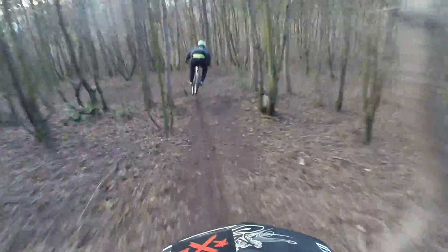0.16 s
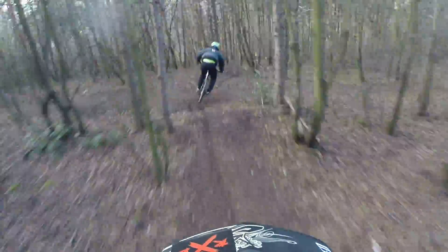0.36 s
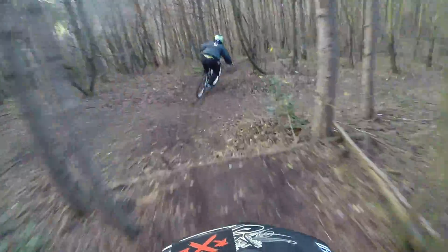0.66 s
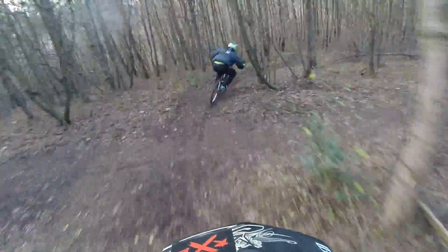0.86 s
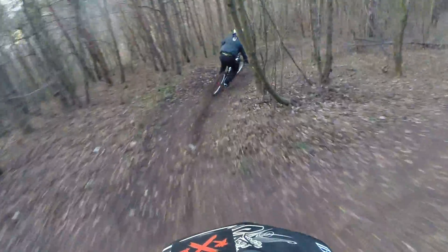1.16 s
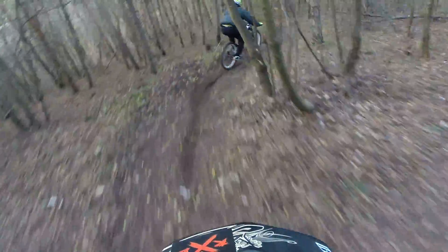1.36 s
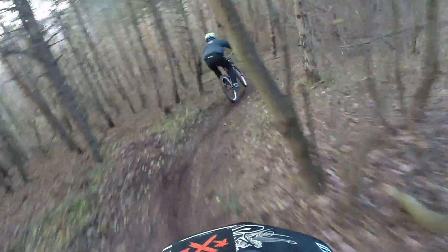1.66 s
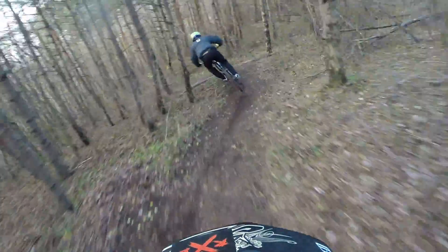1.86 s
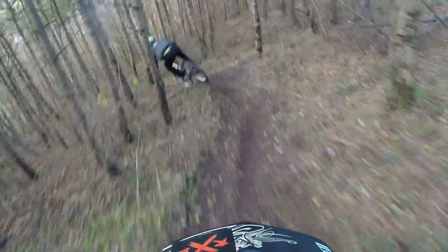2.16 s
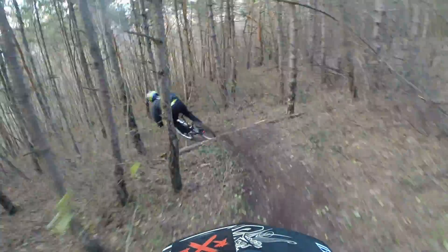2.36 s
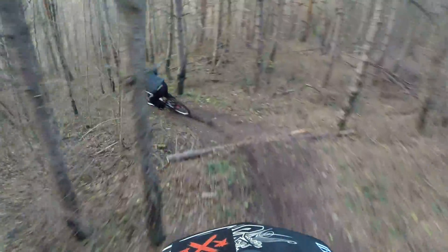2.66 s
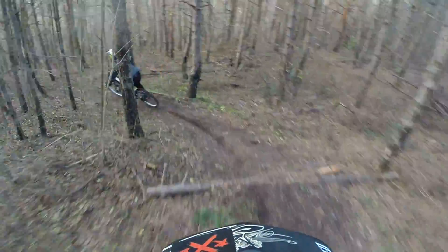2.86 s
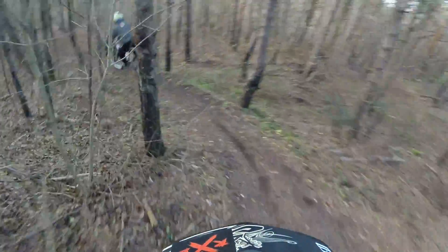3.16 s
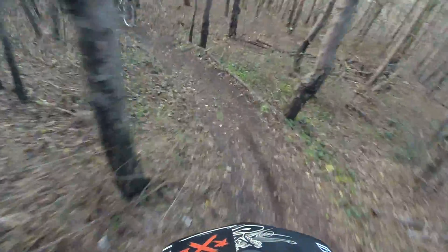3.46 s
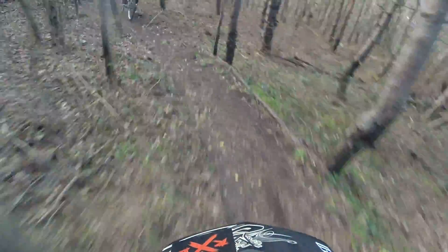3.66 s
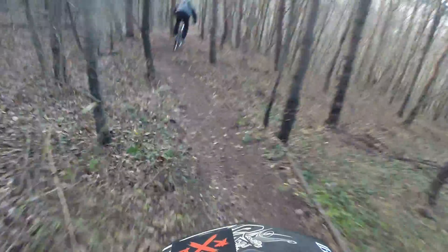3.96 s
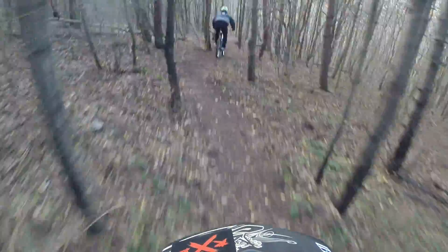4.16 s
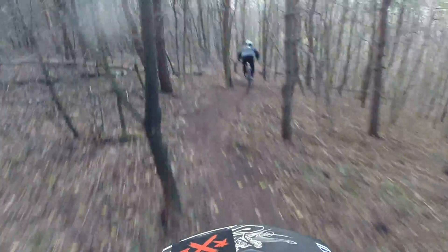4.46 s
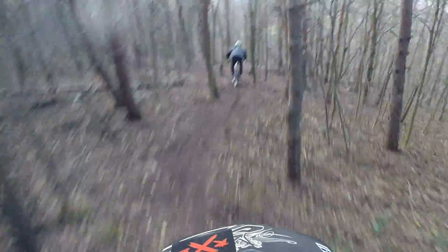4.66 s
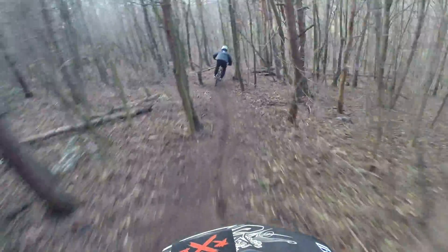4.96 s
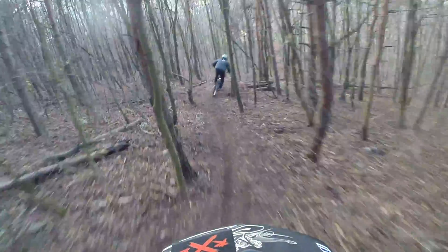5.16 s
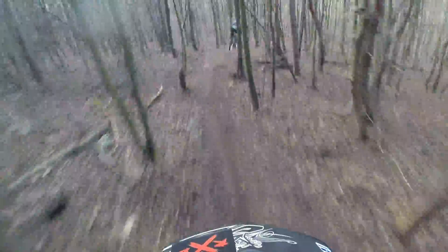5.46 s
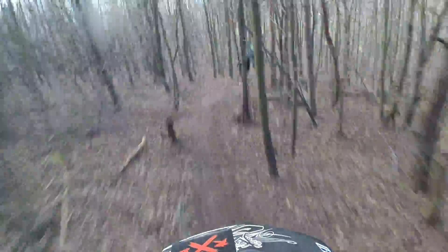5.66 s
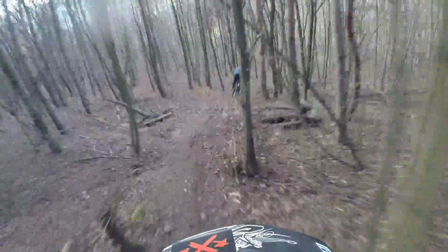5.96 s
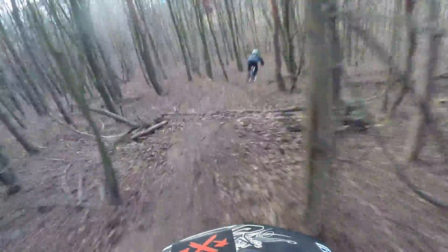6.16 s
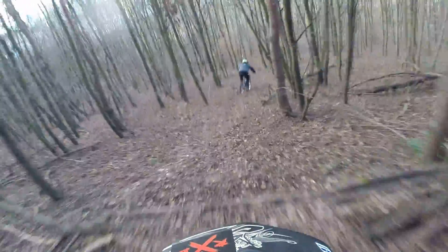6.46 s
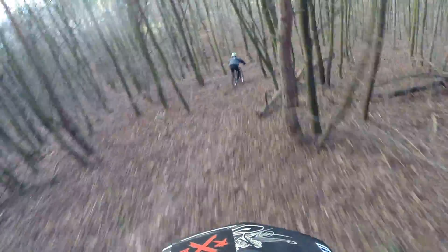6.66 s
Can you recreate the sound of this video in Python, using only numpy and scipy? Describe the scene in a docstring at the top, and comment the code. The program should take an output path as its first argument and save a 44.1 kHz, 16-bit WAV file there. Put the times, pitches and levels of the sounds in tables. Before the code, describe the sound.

From a cased microphone on a mountain biker's helmet in open woods, hollow wind hiss and low buffeting start strong, then sink through slow bends, revealing tyre crunch, chain jangle and clattering stones. Dull bumps thud. Speed and hiss return, a hard knock lands, and late on a twig whips the helmet with a very loud scraping crack, after which everything is briefly quieter.

```python
"""Wind hisses through and buffets a cased camera on the helmet of a mountain biker on a fast forest descent.
The hiss is noise lifted at the resonances of the case; slow noise makes the buffeting and rumble.
The tyres crunch over dirt and leaves in clumps of tiny cracks; chain, stones and metal parts jangle.
Bumps knock the mount, heard as dying sines, and the brake discs are rubbed lightly.
Near the end something, probably a twig, whips the helmet, and the gain control ducks."""
import sys
import numpy as np
from scipy import signal
from scipy.fft import rfft, irfft
from scipy.io import wavfile
from scipy.ndimage import uniform_filter1d

SR = 44100
rng = np.random.default_rng(int(sys.argv[2]) if len(sys.argv) > 2 else 0)


def store_wav(level_fs):
    """Save 16-bit WAV to argv[1]."""
    pcm = np.round(np.clip(np.atleast_2d(level_fs), -1, 1) * 32767)
    wavfile.write(sys.argv[1], SR, pcm.T.astype(np.int16))


N = 300318
TIME = np.arange(N) / SR
# In all tables, t60_s is the time a sound takes to fall by 60 dB.


def amp(db):
    """Turns decibels into gain."""
    return 10 ** (np.asarray(db) / 20)


def unit(x):
    """Scales a sound to an rms of 1."""
    return x / np.sqrt(np.mean(x ** 2) + 1e-20)


def level(curve):
    """Gain at every sample from rows of start_s, level_db, joined by straight lines in dB."""
    return amp(np.interp(TIME, *np.transpose(curve)))


def swells(rows, fade_s=0.042):
    """Gain at every sample from rows of start_s, length_s, level_db; each rises, holds and falls."""
    total = np.zeros(N)
    for start_s, length_s, db in rows:
        to_edge_s = np.minimum(TIME - start_s, start_s + length_s - TIME)
        total += amp(db) * np.clip(to_edge_s / fade_s, 0, 1)
    return total


def add(mix, start_s, sound):
    """Mixes a sound in at its start time, cut off at the end of the scene."""
    part = mix[round(start_s * SR):][:len(sound)]
    part += sound[:len(part)]


def colour(x, points, lifts=()):
    """Shapes a sound by a spectrum with resonances on top, then scales it to an rms of 1."""
    hz = np.fft.rfftfreq(len(x), 1 / SR)
    points_hz, points_db = np.transpose(points)
    db = np.interp(np.log(hz + 1), np.log(points_hz + 1), points_db)
    for centre_hz, width_hz, lift_db in lifts:
        db = db + lift_db / (1 + (2 * (hz - centre_hz) / width_hz) ** 2)
    return unit(irfft(rfft(x) * amp(db), len(x)))


def drift(rate_hz):
    """Slow random motion with an rms of 1, weak above its rate."""
    hz = np.fft.rfftfreq(N, 1 / SR)
    noise = rng.standard_normal(N)
    return unit(irfft(rfft(noise) / (1 + (hz / rate_hz) ** 4), N))


def steady(x, span_s):
    """Evens out the loudness swells that are slower than the span."""
    window = signal.windows.hann(int(span_s * SR) + 3)
    power = signal.fftconvolve(x ** 2, window / window.sum(), "same")
    return x / np.sqrt(power + 1e-4)


def lowpass(x, order, corner_hz):
    """Dulls a sound above a corner frequency."""
    return signal.sosfilt(signal.butter(order, corner_hz, fs=SR, output="sos"), x)


def ring(modes):
    """A struck body: dying sines set off together, every other one upside down."""
    t = np.arange(SR // 2) / SR
    total = np.zeros(len(t))
    for k, (pitch_hz, db, t60_s) in enumerate(modes):
        decay = np.exp(-np.log(1000) * t / t60_s)
        total += (-1) ** k * amp(db) * np.sin(2 * np.pi * pitch_hz * t) * decay
    return total


def burst(t, rise_s, t60_s):
    """Loudness curve of a blow: a quick straight rise, then an exponential fall."""
    decay = np.exp(-np.log(1000) * np.maximum(t - rise_s, 0) / t60_s)
    return np.minimum(t / rise_s, 1) * decay


def jangle(centre_hz, octaves, t60_s, rise_s=0.00099, contacts_per_s=350, contact_db=9, case_hz=9500):
    """A short run of separate contacts in one band of pitch; a narrow band pings."""
    t = np.arange(8192) / SR
    hz = np.fft.rfftfreq(len(t), 1 / SR) + 1
    muffle = 1 / (1 + (hz / case_hz) ** 4)  # the case keeps out the highest treble
    band = 1 / (1 + (np.log2(hz / centre_hz) / octaves) ** 2)
    hits = rng.random(len(t)) < contacts_per_s / SR
    contacts = np.convolve(hits, np.ones(16), "same")  # each contact lasts 16 samples
    drive = rng.standard_normal(len(t)) * (1 + amp(contact_db) * contacts)
    sound = steady(unit(irfft(rfft(drive) * band * muffle)), 0.008)
    return np.roll(sound, len(t) // 2) * burst(t, rise_s, t60_s)  # starts from the middle of the noise


# brake pads brushing the discs: start_s, length_s, level_db
BRAKES = [(2.451, 0.2, -53), (3.929, 0.2, -55)]


def brakes(disc_hz=2230, width_hz=340, lift_db=22):
    """Light rubbing is noise that excites one resonance of the disc, too weakly to squeal."""
    out = np.zeros(N)
    rub_colour = [(800, -30.5), (2200, -2.5), (6000, -22.0)]  # pitch_hz, relative level_db
    for start_s, length_s, db in BRAKES:
        swell = signal.windows.tukey(int(length_s * SR), .5)
        noise = rng.standard_normal(len(swell))
        rub = colour(noise, rub_colour, [(disc_hz, width_hz, lift_db)])
        add(out, start_s, amp(db) * swell * rub)
    return out


# thin metallic pings: start_s, level_db, pitch_hz
PINGS = [(1.587, -49, 4630), (2.143, -65, 9080), (2.228, -58, 9450), (3.497, -64, 9450),
         (3.622, -51.5, 4600)]


def pings():
    """Small metal parts jangle in a band so narrow that it has a pitch."""
    out = np.zeros(N)
    for start_s, db, pitch_hz in PINGS:
        add(out, start_s, amp(db) * jangle(pitch_hz, octaves=0.059, t60_s=0.081))
    return out


# front, then rear wheel striking a root: start_s, level_db
ROOT = [(3.789, -44.5), (3.855, -40)]


def frame():
    """The frame rings in a low, narrow band as each wheel strikes the root."""
    out = np.zeros(N)
    for start_s, db in ROOT:
        add(out, start_s, amp(db) * jangle(640, octaves=0.2, t60_s=0.068))
    return out


# stones and sticks clattering under the wheels: start_s, level_db, t60_s
STONES = [(1.497, -39.5, 0.08), (1.602, -42, .045), (2.284, -43.5, .06), (2.858, -46, 0.1),
          (3.568, -45, 0.13), (3.788, -43, 0.17), (3.853, -35, 0.046), (4.027, -40.5, .06),
          (4.333, -35, 0.032)]


def stones():
    """Stones and sticks clatter as jangles in the middle of the pitch range."""
    out = np.zeros(N)
    for start_s, db, t60_s in STONES:
        add(out, start_s, amp(db) * jangle(2060, octaves=0.36, t60_s=t60_s, rise_s=0.0017))
    return out


def ticks(per_s=9, tick_db=-58.5, spread_db=5.5, pitch_hz=5400, spread_octaves=0.22, load_slope=2.0):
    """The chain ticks lightly at random times, louder where the tyres work harder."""
    out = np.zeros(N)
    starts = TIME[rng.random(N) < per_s / SR]
    for start_s in starts:
        size, shift = rng.standard_normal(2)
        centre_hz = pitch_hz * 2 ** (spread_octaves * shift)
        tick = jangle(centre_hz, octaves=.4, t60_s=.028)
        add(out, start_s, amp(tick_db + spread_db * size) * tick)
    return out * unit(level(TYRES) ** load_slope)


# hardest slaps of the chain: start_s, level_db, centre_hz, width_octaves
CHAIN = [(.904, -52, 6100, .15), (1.301, -52, 6300, .3), (1.436, -56, 5900, .26), (1.472, -61, 5200, .5),
         (1.686, -49, 3500, 1), (2.007, -50.5, 5500, 0.51), (2.266, -45.5, 4940, 0.54),
         (2.75, -55, 5000, .7), (3.872, -43, 3500, .8), (4.087, -47.5, 4500, .55),
         (4.262, -41.5, 5900, 0.3), (4.622, -53.5, 6000, .6), (5.708, -45, 4500, .36)]


def chain():
    """Each hard slap of the chain is a bright jangle of contacts."""
    out = np.zeros(N)
    for start_s, db, centre_hz, octaves in CHAIN:
        add(out, start_s, amp(db) * jangle(centre_hz, octaves, t60_s=0.043))
    return out


# bumps that jolt the mount: start_s, level_db (before a shared 3 dB cut), corner_hz (lower is duller)
KNOCKS = [(0.671, -12, 89), (1.2911, -11.5, 655), (1.707, -25, 89), (2.17, -30, 250), (3.607, -9, 55),
          (3.641, -27, 170), (3.735, -13, 60), (3.776, -27, 400), (3.859, -13, 70), (4.7716, -1.5, 4973),
          (5.51, -12.5, 90), (6.2727, -9.5, 563), (6.774, -14, 786)]
# dead, quickly dying modes of the mount: pitch_hz, relative level_db, t60_s
MOUNT = [(82.96, -16, 0.1), (180, -8, .04), (252, -7.5, 0.067), (365, -9, 0.011), (710, -20, 0.026),
         (955, -9, 0.017), (1504.6, -2, 0.014), (1789.6, -7, 0.027), (2066, -7.5, 0.019), (2630, -11, 0.01)]
# longer ring of helmet and mount: pitch_hz, relative level_db, t60_s
HELMET = [(90.647, -3.5, 0.2349), (249.23, -10, 0.41), (363, -24.5, .3), (483, -20.5, 0.22),
          (628, -6, 0.15), (795, -28.5, .15), (947, -13, .13)]


def knocks(knock_db=-3, rebound=0.58, rebound_s=0.001285, ring_db=-30):
    """The mount hits its stop and rebounds once; soft bumps stir only its low modes."""
    out = np.zeros(N)
    blow = ring(MOUNT) + amp(ring_db) * ring(HELMET)
    for start_s, db, corner_hz in KNOCKS:
        soft = lowpass(lowpass(blow, 2, corner_hz), 5, 3000)
        knock = amp(db + knock_db) * soft
        add(out, start_s, knock)
        add(out, start_s + rebound_s, rebound * knock)
    return out


# the twig slaps, drags and snaps free: start_s, level_db, t60_s, crack_share (0 dull to 1 bright)
WHIP = [(6.3712, -3, .03, .12), (6.3733, 7.5, .026, .025), (6.3783, 8, .03, .09), (6.3853, 9.5, .016, .97),
        (6.3902, -3, .012, .01)]
# spectrum of the dull slap: pitch_hz, relative level_db
SLAP = [(50, -45), (110, -6.5), (250, -8), (420, -19.5), (900, -20.5), (1400, -1.5), (1850, -6),
        (2800, -2.5), (3300, -12), (5000, -17), (8000, -43.5), (15000, -61)]
# spectrum of the bright crack: pitch_hz, relative level_db
CRACK = [(60, -47), (350, -12), (1400, -0.5), (4300, -2.5), (5000, -2), (6100, 2.5), (7400, -6.5),
         (9000, -7), (10000, -16.5), (12000, -22), (15000, -42)]
# pitches that ring briefly in the twig's strike: pitch_hz, width_hz, level_db of the added ring
STRIKE_PITCHES = [(1488, 200, 0.5), (1650, 100, -4.5), (1910, 34, -6.5), (2190, 100, 3), (2250, 73, -6.5),
                  (2870, 88, -3)]


def twig(ring_db=-11, thump_db=5):
    """A quick run of scraping slaps on the helmet, which rings on while the mount is jolted."""
    slaps = np.zeros(N)
    t = np.arange(4096) / SR
    for start_s, db, t60_s, crack_share in WHIP:
        slap = colour(rng.standard_normal(len(t)), SLAP)
        crack = colour(rng.standard_normal(len(t)), CRACK)
        blend = np.sqrt(1 - crack_share) * slap + np.sqrt(crack_share) * crack
        scrape = np.roll(steady(blend, 0.0027), len(t) // 2)
        add(slaps, start_s, amp(db) * scrape * burst(t, 0.0013, t60_s))
    out = slaps.copy()
    for pitch_hz, width_hz, db in STRIKE_PITCHES:
        out += amp(db) * signal.lfilter(*signal.iirpeak(pitch_hz, pitch_hz / width_hz, SR), slaps)
    thump = lowpass(ring(MOUNT), 2, 500)
    add(out, WHIP[1][0], amp(ring_db) * ring(HELMET) + amp(thump_db) * thump)  # from the second slap
    return out


# dull shudder of the padded helmet after the twig: pitch_hz, relative level_db
SHUDDER = [(60, -7.5), (220, 1), (400, -11), (750, -5), (1100, -13), (1900, -9), (4000, -32.5),
           (12000, -48)]


def shudder(shudder_db=-19.5, rise_s=0.0018, t60_s=.14):
    """The twig's blow dies away in the helmet's many damped modes, made as fading dull noise."""
    out = np.zeros(N)
    t = np.arange(SR // 2) / SR
    noise = colour(rng.standard_normal(len(t)), SHUDDER)
    add(out, WHIP[1][0], amp(shudder_db) * noise * burst(t, rise_s, t60_s))
    return out


# how hard the tyres bite into dirt and dry leaves: start_s, level_db (before a shared 3.5 dB cut)
TYRES = [(0, -45.5), (1.25, -51.5), (1.6, -47.5), (2.45, -49), (2.7, -51), (3.45, -55), (3.88, -48),
         (4.9, -49.5), (5.55, -49), (5.85, -44.5), (6.55, -49.5), (6.8, -44)]
# spectrum of the crunch: pitch_hz, relative level_db
TYRE_COLOUR = [(100, -24), (400, -10.5), (1100, -12), (1300, -10), (1750, -6), (2000, -9), (2250, -1),
               (2900, -12), (3700, -19), (4600, -16.5), (6200, -18.5), (8000, -28.5), (10000, -32),
               (15000, -49.5)]


def tyres(grains_per_s=900, spread_db=2.5, clump_db=2.0, grit_db=-4, roll_db=-2):
    """The tread crushes grit and leaves: clumps of tiny cracks over a rolling hiss."""
    loudness = amp(spread_db * np.minimum(rng.exponential(1, N), 4))
    sizes = loudness * rng.choice([-1, 1], N)
    grit = unit(sizes * (rng.random(N) < grains_per_s / SR))
    crunch = amp(grit_db) * grit + amp(roll_db) * rng.standard_normal(N)
    clumped = crunch * amp(clump_db * drift(38))
    return colour(clumped, TYRE_COLOUR) * level(TYRES) * amp(-3.5)


def with_speed(db, slope, reference_db=-34):
    """Gain that follows the wind: the given level at the reference hiss, slope dB more per dB of hiss."""
    return amp(db) * (level(WIND) / amp(reference_db)) ** slope


# spells of turbulence that push on the case: start_s, length_s, level_db
BUFFET = [(.37, 0.49, -30), (1.17, 0.71, -27), (2.06, 0.397, -30), (3.55, 0.568, -24.5), (3.79, 0.12, -22),
          (5.68, 0.09, -21.5), (6.16, .22, -26)]
# spectrum of the buffeting: pitch_hz, relative level_db
BUFFET_COLOUR = [(6, -31.5), (14, 7.5), (24, -5), (34, -6), (50, -17), (80, -19), (200, -58), (600, -85.5)]
# rough patches of trail that shake the helmet: start_s, length_s, level_db
ROUGH = [(.45, 0.27, -45.5), (2.5, 0.12, -48.5), (2.86, 0.13, -50), (3.57, 0.14, -58), (6.22, 0.11, -40.5)]
# spectrum of the helmet's rumble: pitch_hz, relative level_db
RUMBLE_COLOUR = [(35, -33), (60, -24.5), (86, 5.5), (140, -11.5), (195, -12), (245, -6), (290, -11.5),
                 (350, -21.5), (700, -26), (1500, -39.5), (4000, -81.5)]


def shaking(jostle_db=-30, lumpy_db=1.5, gusty_db=1.34):
    """Gusts push on the case; rough ground and turbulence shake the helmet at its low resonances."""
    gusts = steady(colour(rng.standard_normal(N), BUFFET_COLOUR), 0.097)
    shake = steady(colour(rng.standard_normal(N), RUMBLE_COLOUR), 0.054)
    spells = swells(BUFFET)
    push = np.hypot(with_speed(-34.5, slope=0.11), spells)
    jolts = swells(ROUGH) + amp(jostle_db) * spells
    ground = np.hypot(with_speed(-42, slope=0.5), jolts)
    lumps = drift(11.3)  # one irregular jolting moves both
    return gusts * push * amp(gusty_db * lumps) + shake * ground * amp(lumpy_db * lumps)


# air speed past the helmet, as the level of its hiss:
# fast straight, two slow bends, fast straight: start_s, level_db
WIND = [(0, -36), (.43, -37), (.52, -41.5), (1.33, -46), (1.5, -52), (1.9, -50), (2.36, -62.5), (2.98, -50),
        (3.18, -61.5), (3.35, -53), (4.23, -56.5), (4.37, -49), (4.72, -43.5), (4.86, -40), (5.25, -35.5),
        (5.58, -39), (5.76, -33.5), (6.28, -35.5), (6.45, -41.5), (6.8, -45)]
# single gusts that lift the hiss: start_s, length_s, level_db
GUSTS = [(.35, 0.084, -34), (.55, 0.13, -37.5), (1.21, .105, -36.5), (1.61, 0.13, -48.5),
         (5.72, 0.097, -50)]
# spectrum of the hiss: pitch_hz, relative level_db
WIND_COLOUR = [(100, -17.5), (330, -21.5), (800, -17), (1080, -13.5), (1280, 0), (1550, -5), (1950, -4),
               (2500, -8), (3350, -13), (3750, -26.5), (5700, -27), (7000, -39.5), (10000, -53.5),
               (15000, -63.5)]
# air resonances of the case: pitch_hz, width_hz, lift_db
CASE = [(1328, 130, 4.5), (1534, 83, 6.5), (1714, 37, 6), (2630, 76, 6.5), (2853, 160, 2.5), (3520, 550, 7),
        (4640, 150, 6), (5570, 290, 7)]


def wind(flutter_db=1.04, waver_db=1.17):
    """Turbulent air is noise that sounds the resonances of the case and flutters."""
    air = colour(rng.standard_normal(N), WIND_COLOUR, CASE)
    strength = np.hypot(level(WIND), swells(GUSTS))
    flutter = amp(flutter_db * drift(35) + waver_db * drift(8.5))
    return air * strength * flutter


def scene():
    """Everything that reaches the one microphone."""
    bike = brakes() + pings() + frame() + stones() + ticks() + chain() + tyres()
    blows = knocks() + twig() + shudder()
    return (bike + blows + shaking() + wind())[None]


def record(dry, hiss_db=-73, ceiling_db=-7, recovery_db_per_s=20, ahead_s=.008, edge_hz=15400):
    """Microphone hiss, gain control that drops just ahead of a peak and recovers slowly, overload, band limit."""
    hiss_colour = [(100, -1.0), (12500, -1), (15500, -4)]  # pitch_hz, relative level_db
    x = dry[0] + amp(hiss_db) * colour(rng.standard_normal(N), hiss_colour)
    power_db = 10 * np.log10(abs(uniform_filter1d(x ** 2, size=130)) + 1e-12)
    power_db = np.interp(TIME + ahead_s, TIME, power_db)  # looks ahead
    fall_db = TIME * recovery_db_per_s
    held_db = np.maximum.accumulate(power_db + fall_db) - fall_db  # peaks held, then slowly let go
    duck_db = np.maximum(held_db - ceiling_db, 0)
    x = np.clip(x / amp(uniform_filter1d(duck_db, size=60)), -1, 1)
    band_limit = signal.firwin(511, edge_hz, window=("kaiser", 9), fs=SR)
    return signal.oaconvolve(x, band_limit, "same")[None]


dry = scene()
out = record(dry)
store_wav(out)
```